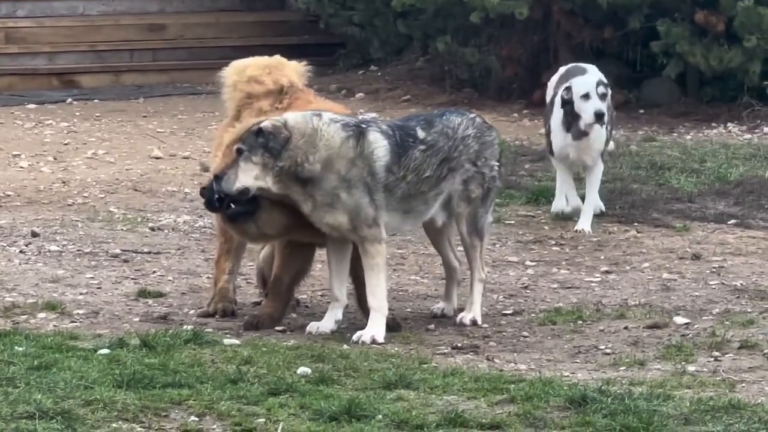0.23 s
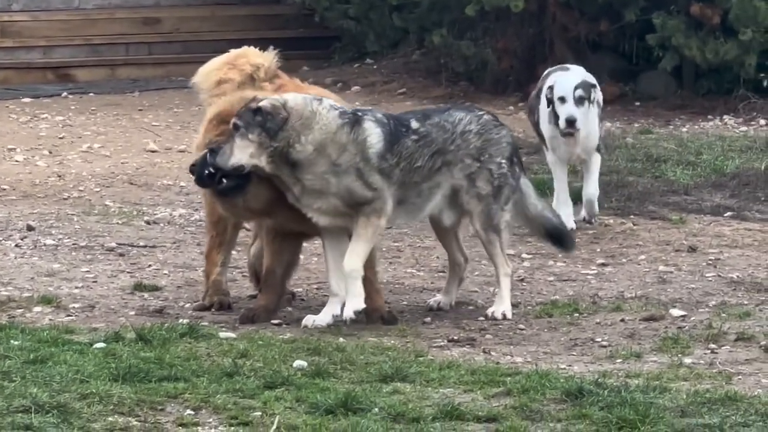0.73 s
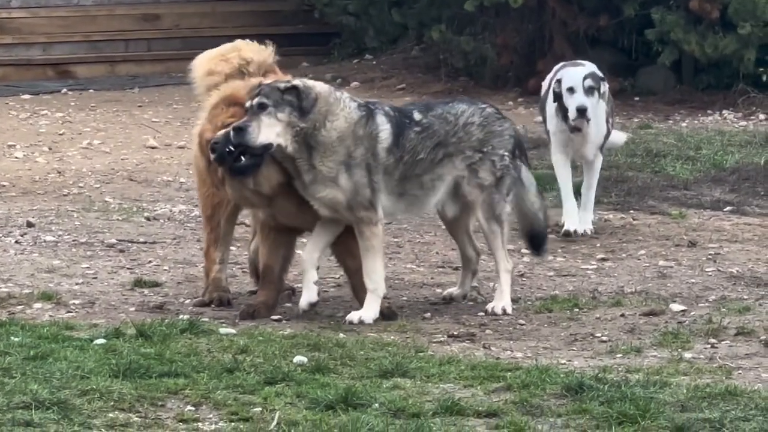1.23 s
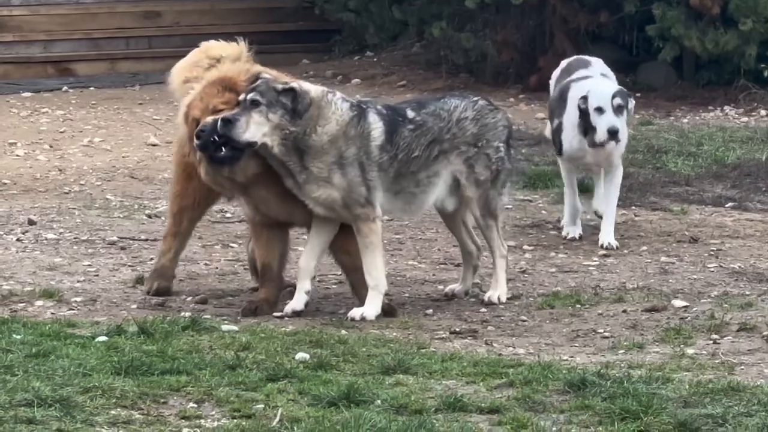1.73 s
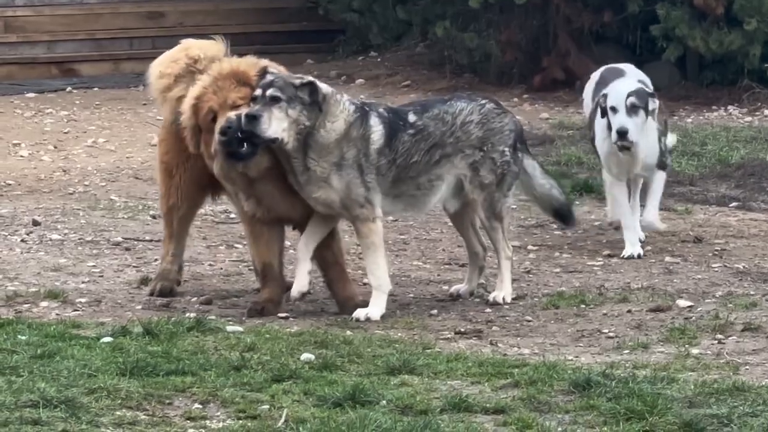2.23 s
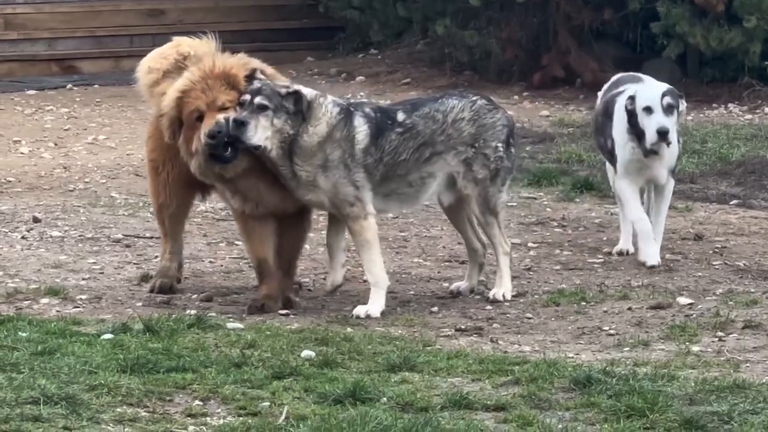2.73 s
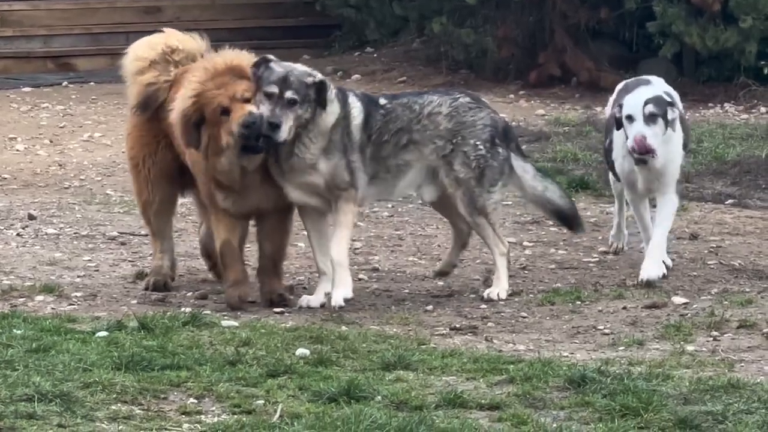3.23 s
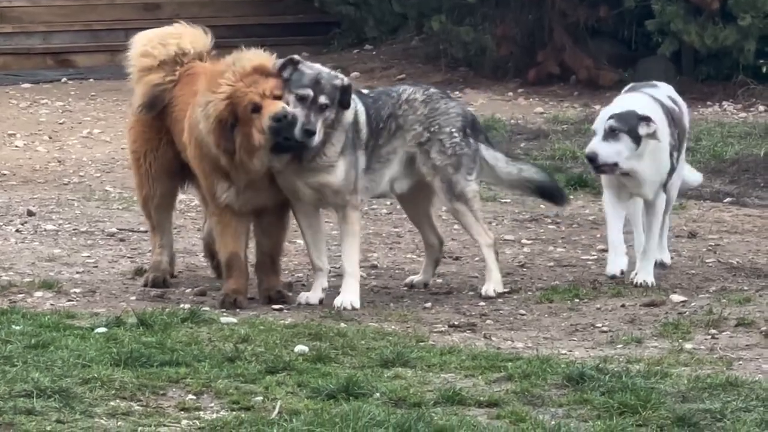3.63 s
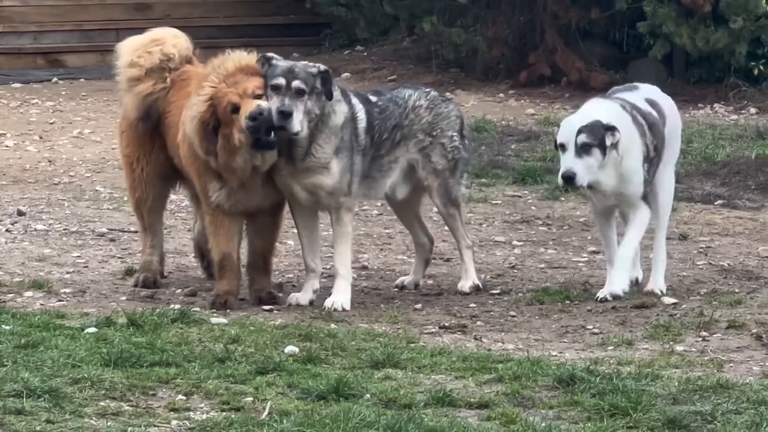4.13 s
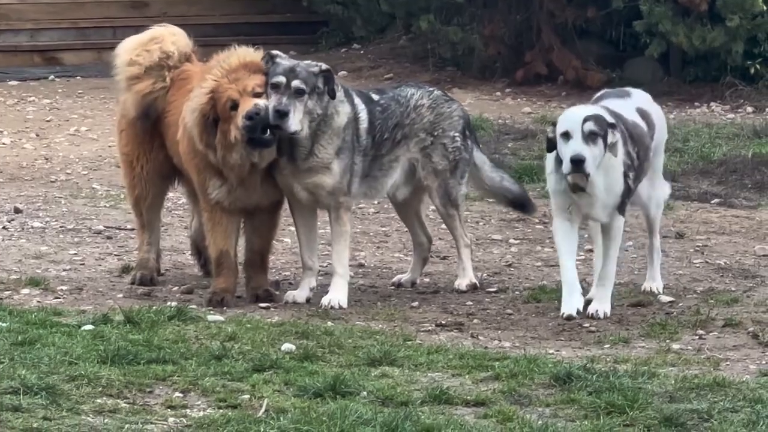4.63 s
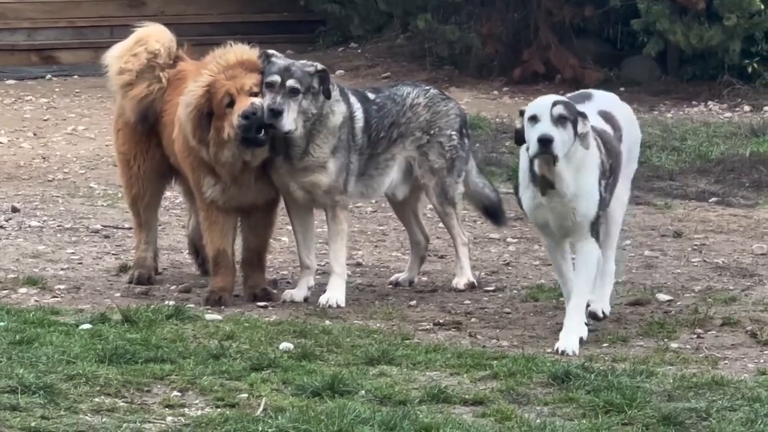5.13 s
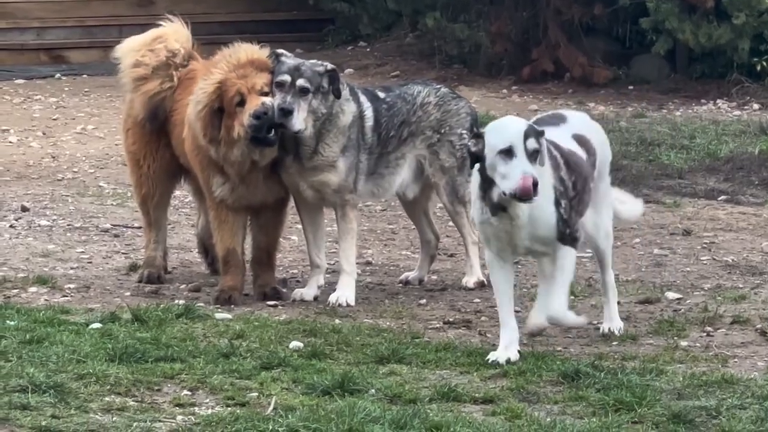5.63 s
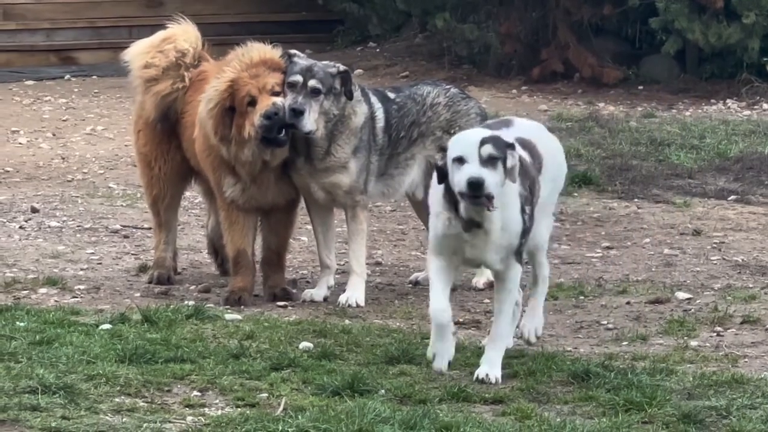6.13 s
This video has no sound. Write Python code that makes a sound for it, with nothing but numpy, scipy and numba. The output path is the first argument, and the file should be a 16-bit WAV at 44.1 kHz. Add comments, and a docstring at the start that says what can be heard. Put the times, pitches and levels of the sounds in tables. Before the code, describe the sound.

Two big dogs growl chest to chest in a dirt yard, some metres from a handheld phone. Short rough surges rise from a deep rumble, with sniffs and small ticks of grit. A hard surge with wind thumps comes near two seconds, the growl sinks by four, then ground rustles and the strongest surge follows just after five. Wind rises at the end.

```python
"""Two big dogs growl chest to chest some metres from a phone in a dirt yard while a third walks up.
First short surges stand out of a rumble, over a faint outdoor hush, with sniffs and ticks of grit under paws.
Near 2 s comes a hard surge with thumps of wind; by 4 s the growl has sunk low. Then the dry ground rustles
more, the strongest surge comes just after 5 s, and the wind rises at the end. Uneven throat pulses ring
chest, throat and mouth; shaped noise makes the rest."""
import sys
import numpy as np
from scipy import signal
from scipy.fft import rfft, irfft, next_fast_len
from scipy.io import wavfile
from scipy.ndimage import uniform_filter1d
from numba import njit

SR = 44100
rng = np.random.default_rng(int(sys.argv[2]) if len(sys.argv) > 2 else 0)


def int16_out(signal):
    """Quantize to a 16-bit WAV file."""
    q = np.round(np.clip(np.atleast_2d(signal).T, -1, 1) * 32767)
    wavfile.write(sys.argv[1], SR, q.astype(np.int16))


N = 282240  # length in samples


def undb(db):
    """Turns dB into a plain gain."""
    return 10 ** (np.asarray(db) / 20)


def unit(x):
    """Scales x to an rms of 1."""
    return x / np.sqrt(np.mean(x ** 2))


def noise():
    """Plain white noise over the whole scene."""
    return rng.standard_normal(N)


def curves(rows):
    """Columns of a table after the time, joined by straight lines at every sample."""
    s, *columns = np.transpose(rows)
    return [np.interp(np.arange(N) / SR, s, c) for c in columns]


def walk(rate):
    """Random levels held for 1 / rate seconds, then smoothed twice; rms 1."""
    k = int(SR / rate)
    steps = np.repeat(rng.standard_normal(N // k + 1), k)
    return unit(uniform_filter1d(uniform_filter1d(steps, k), k)[:N])


def colour(points):
    """Noise of rms 1 with the spectrum drawn by (Hz, dB) points."""
    hz, db = np.transpose(points)
    f = np.maximum(np.arange(N // 2 + 1) * SR / N, 1)
    level_db = np.interp(np.log(f), np.log(hz), db, left=-120, right=-120)
    return unit(irfft(rfft(noise()) * undb(level_db), N))


@njit
def svf(x, hz, width):
    """State-variable band-pass with a moving centre, gain 1 there."""
    y, b, l = np.empty(len(x)), 0., 0.
    for i in range(len(x)):
        g, k = np.tan(np.pi * hz[i] / SR), width / hz[i]
        v = (b + g * (x[i] - l)) / (1 + g * (g + k))
        b, l, y[i] = 2 * v - b, l + 2 * g * v, k * v
    return y


def ring(x, hz, width_hz):
    """A resonance applied twice, for steep skirts; the width is that of one pass."""
    hz = hz * np.ones(N)
    once = svf(x + 1e-18, hz, 1. * width_hz)
    return svf(once, hz, 1. * width_hz)


def body(x, modes, shift=1):
    """Sum of resonances, neighbours in opposite sign; shift moves them together."""
    return sum((-1) ** k * undb(db) * ring(x, hz * shift, w) for k, (hz, w, db) in enumerate(modes))


def dull(x, hz):
    """Steep low-pass."""
    return signal.sosfilt(signal.butter(4, hz, fs=SR, output="sos"), x)


def even(x, span_s):
    """Partly evens out the loudness of x over span_s seconds; rms 1."""
    power = uniform_filter1d(unit(x) ** 2, int(span_s * SR))
    return unit(x / (power + .02) ** .3)


# Tone of the outdoor hush. Each row: frequency in Hz, relative level in dB per Hz.
HUSH_COLOUR = [(180, -26.5), (300, 7), (600, -28), (808, -17), (1220, -37), (4080, -39.5), (8310, -41),
               (9800, -61), (11000, -45.5), (15600, -49.5)]
HUSH_DB = -64.5


def hush():
    """The faint outdoor background: steady noise of a fixed colour."""
    return undb(HUSH_DB) * colour(HUSH_COLOUR)


# Dry ground rustling. Each row: time in seconds, level in dB.
RUSTLE_LEVEL = [(0.0, -76.5), (.65, -81.5), (.8, -77.5), (1.13, -80.5), (1.42, -80), (1.7, -81.5),
                (2.37, -87), (2.46, -76.5), (4.11, -81), (4.32, -73), (4.69, -73.5), (4.8, -81.5),
                (4.9, -75), (5.11, -70.5), (5.33, -82), (5.74, -76), (6.36, -84)]
# Tone of the grains, then of the finest dust. Each row: frequency in Hz, relative level in dB per Hz.
GRAIN_COLOUR = [(590, -34.5), (1000, -1), (1520, -1.5), (2030, -3), (3280, -7.5), (4680, -9), (7500, -13),
                (9750, -47)]
DUST_COLOUR = [(4590, -30.5), (7800, 0), (8310, 0.5), (9040, -7.5), (13900, -16.5), (15600, -18.5)]


def rustle():
    """Dense crumbling grains that flicker; the finest dust comes and goes on its own."""
    flicker = undb(1.7 * walk(20) + 2.1 * walk(150))
    grains = unit(flicker * colour(GRAIN_COLOUR))
    dust = unit(undb(4.5 * walk(9)) * colour(DUST_COLOUR))
    level_db = curves(RUSTLE_LEVEL)[0]
    return undb(level_db) * (grains + undb(-12.5) * dust)


# A dog's sniffs. Each row: start in seconds, end in seconds, centre in Hz, width in Hz, level in dB.
SNIFF_PUFFS = [(0.34, 1.4, 2400, 1000, -83), (2.94, 3.29, 4420, 1400, -80),
               (2.924, 3.148, 2470, 1000, -79.5), (5.55, 5.88, 4180, 1100, -77.5)]


def sniffs():
    """Air through the nose: hiss in one broad nasal band that swells, flickers and fades."""
    t, out = np.arange(N) / SR, 0
    for start, end, hz, width_hz, db in SNIFF_PUFFS:
        progress = np.clip((t - start) / (end - start), 0, 1)
        puff = np.sin(np.pi * progress) ** 0.67 * undb(2.2 * walk(25))
        out = out + undb(db) * puff * unit(ring(noise(), hz, width_hz))
    return out


# Grit ticking under paws. Each row: time in seconds, relative level in dB, top over that level in dB.
PAW_TICKS = [(0.2014, -54, -10), (0.2615, -59, -7), (0.757, -57, -9), (0.9132, -62.5, -8),
             (1.083, -62, -3.5), (1.3149, -49.5, -20), (1.3762, -54, -16.5), (1.99, -56.5, -16.5),
             (2.5956, -56, -13), (2.6713, -58.5, -12), (2.829, -76, 11.5), (2.9394, -56.5, -28),
             (3.521, -54.5, -17), (3.839, -63, 0), (4.12, -65.5, 5), (4.152, -60, -20), (4.169, -53.5, -39),
             (4.229, -54, -11.5), (4.263, -56, -10), (4.281, -45, -22), (4.434, -44.5, -19),
             (4.8653, -58, -37), (5.0704, -57, 0), (5.0861, -41, -37), (5.439, -58.5, -27),
             (5.6376, -51, -32), (5.846, -53, -30), (5.984, -65, -30), (6.1075, -56.5, -25)]
# Low, then high rings of the grit. Each row: centre in Hz, width in Hz, relative level in dB.
GRIT_LOW = [(2050, 610, 3.5), (1320, 940, -9), (2370, 450, -6), (3160, 1800, -4.5)]
GRIT_HIGH = [(5000, 4600, 6.5), (8400, 1300, -2.5), (12400, 1200, -4)]


def ticks():
    """Each tick is a short crack with a grainy scuffing tail, through the low and high rings of the grit."""
    low, top = np.zeros(N), np.zeros(N)
    t = np.arange(int(.3 * SR)) / SR
    grain = undb(2.6 * np.repeat(rng.exponential(size=N // 128 + 1), 128))
    for s, db, top_db in PAW_TICKS:
        i = max(int((s - .001) * SR), 0)
        n = min(len(t), N - i)
        crack = 0.63 * np.exp(-t[:n] / 0.0028)
        scuff = grain[i:i + n] * (0.07 * np.exp(-t[:n] / 0.02) + 0.055 * np.exp(-t[:n] / 0.066))
        shape = (1 - np.exp(-t[:n] / 0.0018)) * (crack + scuff)  # soft onset
        low[i:i + n] += undb(db) * shape
        top[i:i + n] += undb(db + top_db) * shape
    grit = np.sign(noise())
    return undb(6.0) * body(low * grit, GRIT_LOW) + undb(7.0) * body(top * grit, GRIT_HIGH)


GUST_HZ, GUST_WIDTH_HZ = 65.8, 58


def gusts(gain):
    """Wind eddies thump the microphone: gusty noise in one wandering deep band."""
    eddies = undb(2.2 * walk(13)) * noise()
    thump = ring(eddies, GUST_HZ * np.exp(0.12 * walk(12)), GUST_WIDTH_HZ)
    return dull(gain * even(thump, 0.07), 570)


MOUTH_SHUT_DB, MOUTH_OPEN_DB = -48.5, 7  # mouth over chest at an easy growl, jaws shut and wide open
# share of each dB of push above an easy growl that the mouth does not follow
MOUTH_LAG, EASY_DB = 0.31, -46


def jaws(db, throat_db, opening):
    """Levels in dB of chest, throat and mouth for a push of the chest and an opening of the jaws."""
    mouth = MOUTH_SHUT_DB + (MOUTH_OPEN_DB - MOUTH_SHUT_DB) * opening - MOUTH_LAG * (db - EASY_DB)
    return [db, db + throat_db, db + mouth]


ATTACK_S, RELEASE_S, SMOOTH_S = 0.0044, 0.015, 0.0012  # edges of surges and thumps
EARLY = .7  # under 1: surges and thumps peak early and sag away


def add(gain, start, length, db, swell):
    """Lifts gain to a hump of the given roundness wherever the hump is higher."""
    a, b = int((start - ATTACK_S) * SR), min(int((start + length + RELEASE_S) * SR), N)
    arch = np.abs(np.sin(np.pi * np.linspace(0, 1, b - a) ** EARLY))
    hump = arch ** np.reshape(swell, (-1, 1))
    gain[:, a:b] = np.maximum(gain[:, a:b], undb(np.reshape(db, (-1, 1))) * hump)


# The rumble between surges. Each row: time in seconds, chest in dB, throat over chest in dB,
# jaw opening from 0 to 1.
RUMBLE = [(0.0, -57, -3.5, 0.61), (.35, -53, 0.5, 0.61), (1.0, -46, -4.5, 0.41), (1.45, -49, 1.5, 0.53),
          (1.9, -51.5, 0, 0.44), (2.13, -53, -0.1, 0.46), (2.75, -49.5, -7.5, 0.34),
          (2.98, -47.5, 3.5, 0.7), (3.3, -50.5, -11.5, 0.57), (3.7, -53.5, -2.5, 0.69),
          (4.1, -52.5, 8, 0.65), (4.55, -45, -3.5, 0.64), (4.85, -47, -1.5, 0.69), (5.45, -38, -9.5, 0.4),
          (5.68, -44, -2, 0.57), (5.9, -36, -12, 0.35), (6.2, -39, -10.5, 0.54), (6.39, -48, 0, 0.3)]
# Hard-edged surges of the growl. Each row: start in seconds, length in seconds, chest in dB,
# jaw opening from 0 to 1.
GROWL_SURGES = [(0.224, 0.02, -40, 0.52), (0.289, 0.2, -44.5, 0.57), (0.938, 0.043, -40, 0.6),
                (1.046, 0.14, -40.5, 0.59), (1.153, 0.082, -45, 0.76), (1.242, .196, -39.5, 0.47),
                (1.411, 0.16, -42.5, 0.57), (1.94, 0.1, -45.5, 0), (2.019, 0.05, -36.5, 0.1),
                (2.096, .04, -29.5, 0.43), (2.269, 0.096, -53.5, 0.63), (2.615, 0.059, -44.5, 0.33),
                (2.749, 0.023, -36, 0.5), (2.906, .127, -47.5, 0.68), (3.123, 0.093, -34, 0.8),
                (3.813, 0.4, -59.5, 0.96), (4.18, 0.082, -44.5, 0.72), (4.292, 0.044, -37, .4),
                (4.437, 0.051, -36.5, 0.3), (4.493, 0.13, -40, 0.1), (4.706, 0.031, -42, 0.71),
                (4.886, 0.048, -39.5, 0.62), (4.941, 0.077, -39, 0.24), (5.082, .12, -27.5, 0.2),
                (5.441, 0.042, -38, 0), (5.655, 0.038, -33.5, 0.48), (5.865, 0.032, -31, 0.05),
                (5.985, 0.032, -33, 0.51), (6.124, 0.1, -33.5, 0.2), (6.304, .12, -51.5, 0.85)]
# Wind on the microphone. Each row: time in seconds, level in dB.
WIND_LEVEL = [(0.0, -49), (1.8, -46.5), (3.2, -48), (4.2, -46.5), (6.05, -40), (6.39, -29)]
# Separate thumps of wind. Each row: start in seconds, length in seconds, level in dB.
WIND_THUMPS = [(0.501, 0.055, -35.5), (0.987, 0.023, -32), (1.23, 0.28, -37.5), (2.052, 0.08, -26),
               (2.102, 0.027, -21.5), (2.283, 0.035, -37), (2.616, 0.041, -38.5), (2.762, 0.057, -33),
               (2.841, 0.062, -33.5), (2.91, 0.14, -36), (3.126, 0.099, -33.5), (5.415, 0.12, -38),
               (5.941, 0.036, -28.5), (6.216, 0.0072, -29), (6.306, 0.091, -30.5)]
# Roundness of a surge, in order: chest, throat, mouth, bass. The mouth moves more gently than chest and throat.
SURGE_SWELL = [.3, 0.45, 0.6, 0.7]
BASS_DB = -10.5  # the deepest bass swells with a surge, this far from the chest


def effort():
    """Gains of chest, throat, mouth and bass: the rumble with surges and thumps standing out of it."""
    chest_db, throat_db, opening = curves(RUMBLE)
    gain = undb(jaws(chest_db, throat_db, opening) + curves(WIND_LEVEL))
    for start, length, db, wider in GROWL_SURGES:
        middle = int((start + length / 2) * SR)
        levels_db = jaws(db, throat_db[middle], wider) + [db + BASS_DB]
        add(gain, start, length, levels_db, SURGE_SWELL)
    for start, length, db in WIND_THUMPS:
        add(gain[-1:], start, length, db, SURGE_SWELL[-1])
    return np.sqrt(uniform_filter1d(gain ** 2, int(SMOOTH_S * SR), axis=1))


# Voice of the throat. Each row: time in seconds, strong-weak pulse pairs per second (Hz) before scatter,
# roughness from 0 to 1.
VOICING = [(0, 68, .4), (1.1, 70, .22), (1.4, 70, .25), (1.7, 66, .5), (1.95, 71, .15), (2.3, 64, .5),
           (3.13, 72, .25), (3.23, 60, .2), (3.4, 66, .45), (5.05, 70, .4), (5.1, 70, .06), (5.22, 71, .12),
           (5.3, 68, .35)]


def folds():
    """Vocal folds: strong-weak pulses whose timing and size scatter with roughness, catching now and then."""
    hz, rough = curves(VOICING)
    phase = np.cumsum(2 * hz * np.exp(.45 * rough * walk(60))) / SR  # two pulses to a pair
    at = np.flatnonzero(np.diff(np.floor(phase)))
    weak = np.where(np.arange(len(at)) % 2, .55, 1)
    pulses = np.zeros(N)
    pulses[at] = weak * undb(12 * rough[at] * rng.standard_normal(len(at)))
    catch = undb(8 * rough * walk(25))
    return catch * (unit(pulses) + rough * .4 * noise())


# Resonances of chest, throat and mouth, and of air rasping past the teeth.
# Each row: centre in Hz, width in Hz, relative level in dB.
CHEST_MODES = [(139.6, 41.5, 14), (105, 66, -0.5)]
THROAT_MODES = [(261.7, 27.8, -2.5), (207.7, 38.3, 1), (334.8, 49.3, -13.5)]
MOUTH_MODES = [(435.4, 131, 7), (572, 150, -7), (725, 190, -10.5)]
RASP_MODES = [(715, 310, 4), (910, 610, -8.5)]


def growl(source, chest, throat, mouth, rasp):
    """The source rings chest, throat and the more turbulent mouth, all shifting as they ring; far, so dull."""
    hz, rough = curves(VOICING)
    air = undb(2.4 * walk(45)) * noise()
    # the chest rings with the pitch, steadier the clearer the voice
    chest_shift = hz / hz.mean() * np.exp(.15 * rough * walk(10))
    chest_ring = even(body(source, CHEST_MODES, chest_shift), .07)
    throat_ring = even(body(source, THROAT_MODES, np.exp(0.055 * walk(9))), 0.032)
    mouth_ring = even(body(source + .6 * air, MOUTH_MODES, np.exp(0.068 * walk(9))), 0.027)
    teeth = unit(body(air, RASP_MODES))
    voice = chest * chest_ring + throat * throat_ring + dull(mouth * mouth_ring, 860) + rasp * teeth
    return dull(voice, 1100)


def scattered_growl(chest, throat, mouth, rasp):
    """Fence and hedge scatter the growl to the sides: noise through the same body, its upper part most."""
    return growl(noise(), undb(-42.5) * chest, undb(-24) * throat, undb(-4.0) * mouth, undb(0.5) * rasp)


FLUTTER_DB, FLUTTER_HZ = 1.5, 44.99  # the whole voice flutters unevenly
# Where the two microphone ports hear differently. Each row: centre in Hz, width in Hz,
# level in dB of the part by which they differ (used in record).
PORT_BANDS = [(900, 550, -12.5), (8300, 1600, -12)]


def scene():
    """Mixes all sources into left and right: a shared middle, plus a side part of opposite sign."""
    chest, throat, mouth, bass = effort()
    chest, throat, mouth = undb(FLUTTER_DB * walk(FLUTTER_HZ)) * np.array([chest, throat, mouth])
    rasp = undb(-40.5) * np.sqrt(mouth)  # the rasp swells less than the mouth
    voice = growl(folds(), chest, throat, mouth, rasp)
    scattered = scattered_growl(chest, throat, mouth, rasp)
    paws = ticks()
    mid = voice + gusts(bass) + paws + rustle() + sniffs() + hush()
    # rustle and hush are wide mostly where the ports differ
    around = rustle()
    wide = sum(ring(undb(-8.5) * hush() + undb(2.2) * around, hz, w) for hz, w, _ in PORT_BANDS)
    side = scattered + undb(-18.0) * around + wide + undb(-21.0) * paws
    return np.array([mid + side, mid - side])


NULL_HZ, NULL_WIDTH_HZ = 7620, 270  # the ports cancel here
LOW_CUT_HZ, TOP_HZ = 34, 15740  # the microphone loses the deepest bass; nearly nothing is left above the top


def record(dry):
    """Around the port resonances left and right part by a phase shift, with one narrow null; both ends are cut."""
    mid = dry.mean(axis=0)
    shifted = np.imag(signal.hilbert(mid, next_fast_len(N)))[:N]  # a quarter turn of phase
    apart = sum(undb(db) * signal.filtfilt(*signal.iirpeak(hz, hz / w, SR), shifted)
                for hz, w, db in PORT_BANDS)
    null = signal.filtfilt(*signal.iirnotch(NULL_HZ, NULL_HZ / NULL_WIDTH_HZ, SR), mid) - mid
    ports = dry + null + np.array([-apart, apart])
    wet = signal.sosfilt(signal.butter(2, LOW_CUT_HZ, "high", fs=SR, output="sos"), ports)
    return signal.sosfilt(signal.ellip(8, .2, 70, TOP_HZ, fs=SR, output="sos"), wet)


dry = scene()
out = record(dry)
int16_out(out)
```